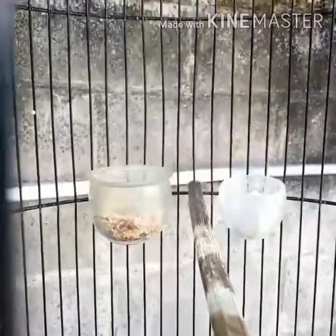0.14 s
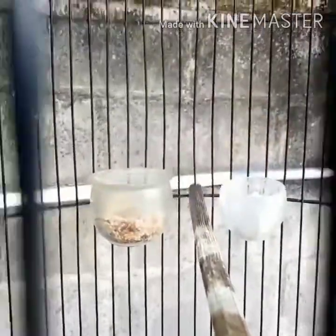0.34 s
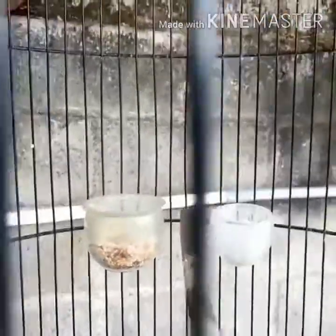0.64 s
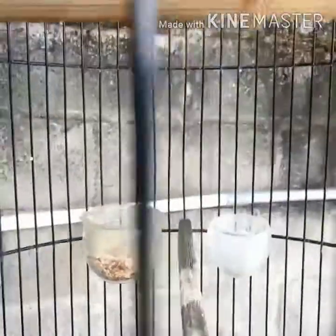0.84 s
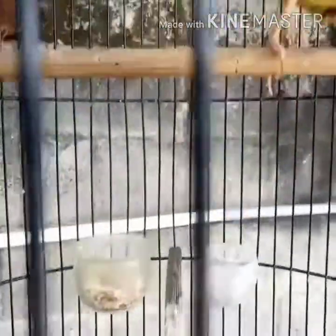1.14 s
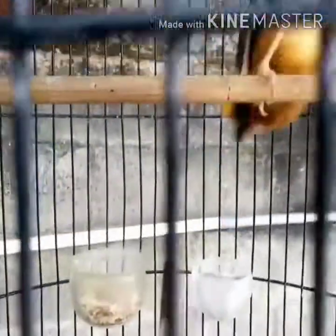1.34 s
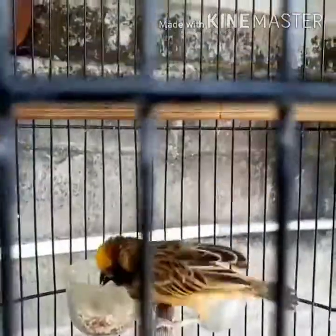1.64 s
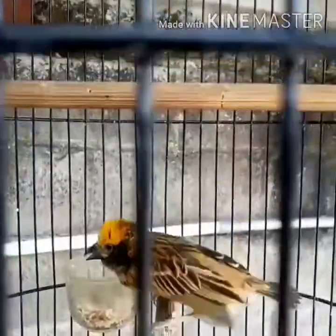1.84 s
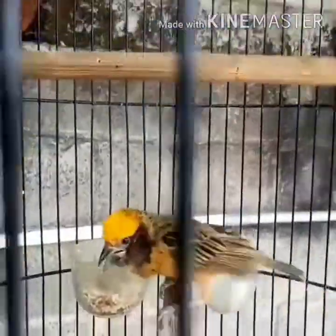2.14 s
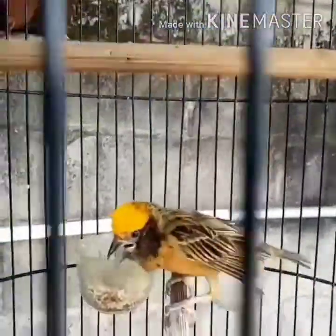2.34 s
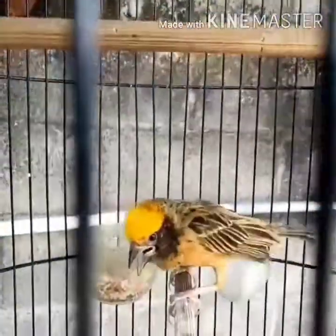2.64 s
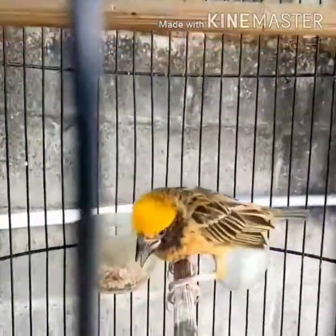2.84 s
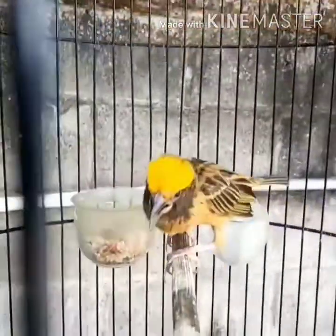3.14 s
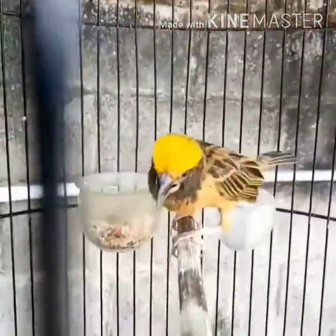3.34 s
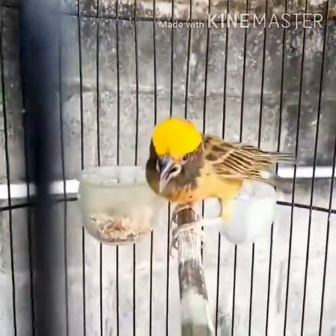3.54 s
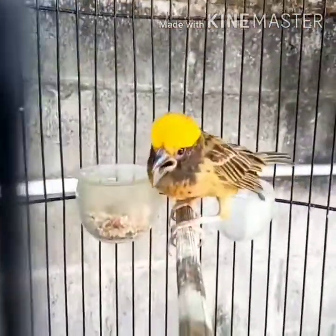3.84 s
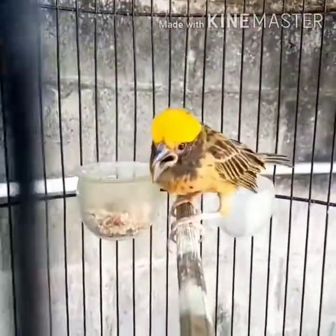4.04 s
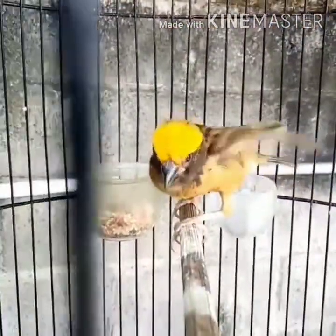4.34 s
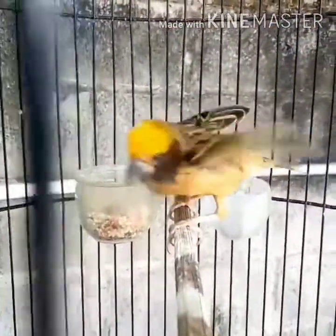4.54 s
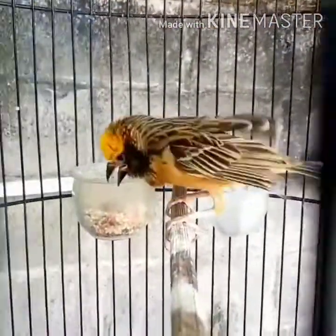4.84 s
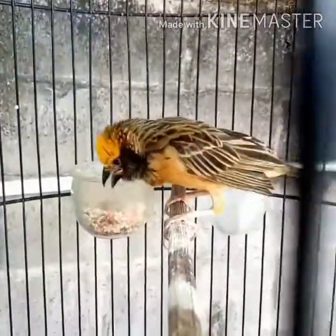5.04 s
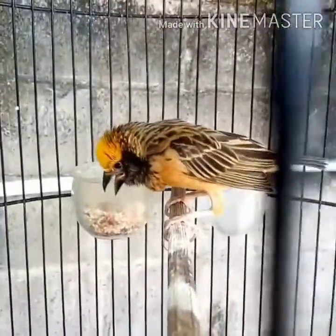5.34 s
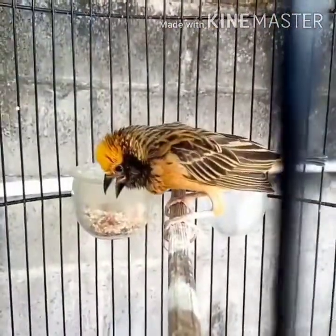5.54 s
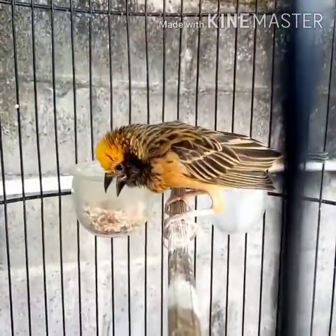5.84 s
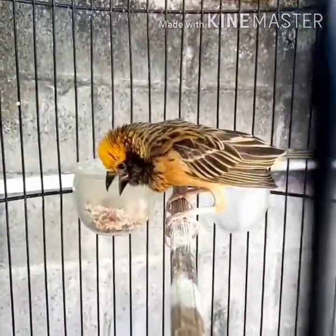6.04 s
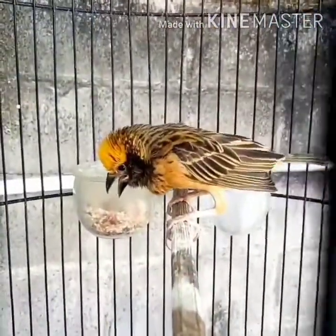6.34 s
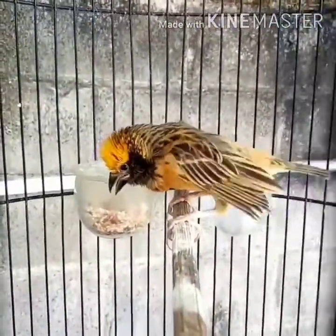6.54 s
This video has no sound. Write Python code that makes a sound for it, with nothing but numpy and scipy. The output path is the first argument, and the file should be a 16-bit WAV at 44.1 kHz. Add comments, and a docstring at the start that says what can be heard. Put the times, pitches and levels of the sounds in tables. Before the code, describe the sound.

Close birdsong in a walled yard: piercing whistles, five rapid downward chirps, long harsh buzzes, then a quivering trill that ends in a rattle.

```python
"""First come the fading tail of an earlier phrase and the whistles of a caged weaver bird close by in a walled yard.
Nasal notes and falling chirps lead into two long buzzes; then a whistle, two chirps, two whistles, a trill and a rattle.
Whistles, chirps and trill are sines with overtones, nasal notes and rattle are stacks of partials,
and buzzes are noise through a throat. Scuffs, blips, a faint band, hiss and wind are shaped noise or soft tones.
The walls ring briefly, and the recorder's gain control rides the level."""
import sys
import numpy as np
from scipy import signal
from scipy.fft import rfft, irfft
from scipy.io import wavfile
from scipy.ndimage import uniform_filter1d

SR = 44100
rng = np.random.default_rng(int(sys.argv[2]) if len(sys.argv) > 2 else 0)


def dump(signal):
    """Clip the signal to [-1, 1] and save it as 16-bit WAV at the path in sys.argv[1]."""
    limited = np.clip(np.atleast_2d(signal).T, -1, 1)
    pcm = np.round(limited * 32767).astype(np.int16)
    wavfile.write(sys.argv[1], SR, pcm)


N = 295457
T = np.arange(N) / SR   # time of every sample in s

# All source levels are those ahead of the recorder's gain control.
# A "colour" is a relative spectrum of noise: [f/Hz, level per Hz/dB]

# tail of an earlier phrase, a colour: [f/Hz, level per Hz/dB]
FADING_COLOUR = [(1200, -29), (2500, -2), (4300, -6.5), (6000, -13.5), (7500, -35)]
# slightly unsteady hiss of the yard, a colour: [f/Hz, level per Hz/dB]
YARD_COLOUR = [(120, -43), (200, -6.5), (338, -8), (532, -8), (781, -8), (1070, -8), (1340, -27.5),
               (1900, -9), (2190, 7), (3330, -9), (6130, -8.5), (7180, -40), (13000, -50)]
YARD_DB = -58.5
# rumble of moving air, a colour: [f/Hz, level per Hz/dB]
WIND_COLOUR = [(12, -64), (20, -60), (54, -11), (102, -7.5), (248, -25), (338, -26), (500, -42),
               (650, -68.5), (1100, -120)]
# puffs of air on the microphone: [middle t/s, level/dB, time from middle to 37 % height/s]
GUSTS = [(0.975, -68, 0.055), (1.486, -62, 0.069), (1.73, -51.5, 0.026), (2.454, -65, 0.067),
         (3.552, -52.5, 0.038), (3.774, -59, 0.033), (3.994, -59.5, 0.052), (4.398, -51, 0.017),
         (4.538, -53.5, 0.053), (4.74, -53, 0.027), (4.953, -59, 0.036), (5.235, -54, .11),
         (5.868, -64.5, 0.19), (6.308, -60, 0.11), (6.577, -49, 0.16)]
BREEZE_DB = -70.5
# faint noise band that swells and sinks: [f/Hz, width of each of two passes/Hz, level/dB]
BACKGROUND_BAND = [(1467, 350, -64)]

# whistles, one list a note: [t/s, f/Hz (the first partial sounds 1 % lower), level before flutter/dB]
WHISTLES = [
    [(0.018, 2848, -33), (0.03, 2790, -9.5), (0.054, 2597, -14.5), (0.082, 2620, -10), (0.094, 2698, -17.5),
     (0.102, 2606, -17.5), (0.138, 2820, -18), (0.158, 2570, -40)],
    [(0.322, 3186, -32.5), (0.328, 2970, -18), (0.346, 2740, -11.5), (0.368, 2820, -8), (0.41, 2851, -10),
     (0.438, 2688, -15), (0.464, 2693, -15.5), (0.475, 2750, -73)],
    [(4.405, 3050, -25), (4.413, 3106, -9.5), (4.447, 2683, -16), (4.453, 2477, -16), (4.457, 2600, -44),
     (4.461, 2650, -17), (4.48, 2585, -27.5)],
    [(4.935, 6300, -22), (4.943, 6240, -23), (4.955, 5570, -24.5), (4.977, 4810, -10.5),
     (4.991, 4510, -16.5), (5.057, 4154, -15.5), (5.081, 4380, -16.5), (5.085, 4400, -23)],
    [(5.18, 3400, -32), (5.188, 3420, -23.5), (5.222, 3300, -15.5), (5.24, 3000, -37), (5.272, 2500, -38)],
]
# how deeply each whistle flutters: [depth/dB]
WHISTLE_FLUTTER = [1.8, .5, 2.5, 3.5, 7]
# overtones of each whistle against its first partial: [2nd level/dB, 3rd level/dB]
WHISTLE_OVERTONES = [(-35.5, -46), (-36, -50.5), (-28.5, -41), (-29.5, -24), (-22.5, -30)]
# breath around whistles and nasal notes, a colour: [f/Hz, level per Hz/dB]
WHISTLE_BREATH = [(1500, -53), (3000, 23), (6000, 17.5), (7800, -2), (10000, 10), (12000, -31),
                  (13600, -60)]
# the voice breaks into a harsh band at the head of two chirps and of the trill:
# [t/s, length/s, low f/Hz, high f/Hz, level/dB]
VOICE_BREAKS = [(4.598, 0.023, 4820, 6180, -18.5), (4.802, 0.022, 4050, 5650, -24),
                (5.219, 0.074, 2890, 4630, -25)]
OVERTONE_CUT_HZ, OVERTONE_SLOPE_DB = 11500, 40   # overtones fade above this, in dB per octave

# falling chirps: [start t/s, end t/s, top f/Hz, bottom f/Hz (first partials sound 1 % lower),
# fall/octaves per s above the resting pitch, level before flutter/dB, held top against that level/dB]
CHIRPS = [(1.743, 1.831, 5560, 2406, 23.7, -19, -2), (1.889, 1.986, 6280, 2418, 22.9, -21.5, -12),
          (2.026, 2.113, 6200, 2337, 27.5, -19.5, -3.5), (2.171, 2.263, 6390, 2366, 25.4, -18.5, -9.5),
          (2.302, 2.391, 6260, 2448, 25, -20, -1), (4.589, 4.687, 5890, 2440, 21.8, -19, -24),
          (4.784, 4.879, 5950, 2424, 23.8, -19.5, 2.5)]
# chirp overtones against the first partial: [2nd level/dB, 3rd level/dB]
CHIRP_OVERTONES = (-27, -36)
CHIRP_FLUTTER_DB = 6
CHIRP_REST_HZ = 1200   # the fall slows toward this pitch; its octaves are counted from there
CHIRP_BEND = .018   # the pitch wavers by this share (rms)
CHIRP_SCOOP, CHIRP_SCOOP_S = 0.0513, 0.00396   # the top starts low by this share and climbs within this time
CHIRP_DIP_DB, CHIRP_DIP_S = 9, .003   # the voice catches where the held top breaks into the fall
CHIRP_FADE_DB, CHIRP_FADE_S = 12.5, 0.046   # the end of the fall dies away

# feet and feathers against perch and wire: [t/s, level/dB, length/s, share that rings the perch/dB]
SCUFFS = [(0.347, -40, 0.0088, -22.5), (1.209, -43.5, 0.051, -31), (1.69, -37, 0.043, 7.5),
          (2.288, -29, 0.026, -43)]
# tones of the perch, before a treble lift: [f/Hz, level/dB, time to fall by 60 dB/s]
PERCH_TONES = [(600, 12, .025), (930, 1, .02), (1420, 1, .02), (2300, -3, .02)]
# faint low blips and far hoots: [t/s, length/s, f/Hz, level/dB]
BLIPS = [(0.465, 0.095, 804, -63), (0.812, 0.062, 335, -63.5), (1.478, 0.078, 740, -65.5),
         (1.964, 0.069, 698, -58.5), (2.108, 0.043, 1440, -45.5), (2.261, 0.066, 600, -56.5),
         (2.414, 0.078, 669, -57), (2.642, 0.094, 337, -59.5), (5.58, 0.21, 998, -60),
         (5.885, 0.19, 1090, -55)]

# nasal notes, one list a note: [t/s, f of the fifth partial/Hz, its level/dB]
NASAL_NOTES = [
    [(1.296, 3004, -24), (1.304, 3030, -20.5), (1.334, 2893, -10), (1.38, 2937, -17), (1.41, 2900, -29)],
    [(1.542, 3069, -28), (1.548, 3130, -27.5), (1.574, 2947, -10), (1.62, 3044, -16.5), (1.642, 2982, -11),
     (1.656, 3118, -19.5), (1.665, 3000, -24)],
]
# their other partials against the fifth: [multiple, level in the first note/dB, level in the second/dB]
NASAL_PARTIALS = [(4, -22, -8), (6, -24, -20), (7, -47, -33.5), (8, -22, -27), (9, -34, -20.5),
                  (10, -25, -21.5), (11, -38, -32.5), (13, -47, -43), (15, -42, -46), (18, -52, -46),
                  (19, -49, -50)]

# buzzes, before waver: [start t/s, end t/s, first level/dB, last level/dB]
BUZZES = [(2.477, 3.477, -21.5, -20), (3.59, 4.322, -18.5, -18)]
# throat resonances with the beak narrow: [f/Hz, width of each of two passes/Hz, relative level/dB]
THROAT_NARROW = [(2265, 390, -3), (3032, 61, -0.5), (3660, 415, -1.5), (4555, 380, 1), (5195, 170, -0.5),
                 (5863, 380, 3.5), (7070, 1340, -10.5), (10150, 940, -11.5), (11900, 640, -18.5)]
# throat resonances with the beak wide: [f/Hz, width of each of two passes/Hz, relative level/dB]
THROAT_WIDE = [(2315, 163, 3), (3240, 900, 0.5), (3640, 590, -4), (4662, 710, 6), (5270, 900, 3.5),
               (6090, 287, 16), (6640, 850, 4), (9400, 500, -9), (11230, 1050, -5.5)]
# beak opening: [t/s, share from 0 to 1]
BEAK_OPENING = [(2.47, .03), (2.85, .12), (3.03, .6), (3.3, .8), (3.5, .9), (4.34, .97)]
# breath in the buzzes, a colour: [f/Hz, level per Hz/dB]
BUZZ_BREATH = [(1000, -97), (1500, -20.5), (2200, -11.5), (4000, -7.5), (6000, 1.5), (7500, -25),
               (8500, -11.5), (11800, -33), (12400, -4), (13600, -45)]
BUZZ_ATTACK_S, BUZZ_RELEASE_S, BUZZ_WAVER_DB = .007, 0.015, 1.0

# trill: [t/s, centre f/Hz, level before dips and beats/dB]
TRILL = [(5.235, 3800, -31), (5.275, 4040, -21), (5.332, 4270, -17.5), (5.43, 4434, -16),
         (5.736, 4155, -16.5), (5.83, 4200, -19.5), (5.87, 4005, -19.5), (6.118, 3810, -20),
         (6.18, 3750, -23.5)]
# trill pulses run together: [t/s, share]
TRILL_FUSING = [(5.225, .05), (5.8, .15), (5.95, .5), (6.15, .6), (6.19, .3)]
# breath in trill and rattle, a colour: [f/Hz, level per Hz/dB]
TRILL_BREATH = [(1500, -50), (2000, -30), (2500, -10), (3500, -6.5), (5500, 4.5), (7000, -7.5), (9300, -16),
                (10200, 2.5), (11300, -23.5), (12600, -7), (13600, -4.5)]
TRILL_RATE, TRILL_FIRST_S = 52.33, 5.2585   # pulses per s, start of a pulse in s
TRILL_RISE = .14   # slope of the pitch in shares per pulse length; it climbs for 65 % of a pulse
TRILL_SECOND_DB, SECOND_GROWS_DB_PER_S, TRILL_THIRD_DB = -39, 33.5, -22   # against the first partial
TRILL_BREATH_DB = -32.5

# rattle partials, relative levels: [multiple, level/dB]
RATTLE_PARTIALS = [(3, -4), (4, -1.5), (1, -21.5), (2, -9), (4.5, -8.5), (5, -16.5), (6, -25), (8, -35),
                   (9, -27)]
RATTLE_HZ = 1198
RATTLE_START_S, RATTLE_GAP_S, RATTLE_PULSES = 6.1818, .0192, 17
RATTLE_SLOWS_FROM, RATTLE_SLOWER_S = 11, .0015   # gaps after this pulse are this much longer
RATTLE_DB, RATTLE_ENDS_DB, RATTLE_UNEVEN_DB = -19.5, 1.5, -1   # weaker at both ends, uneven by chance
# low partials grow late, are stronger on every other pulse, and die fast like a knock
RATTLE_LOW_DB, LOW_GROWS_DB, LOW_ALTERNATES_DB, LOW_DIES_DB_PER_S = -11, 8, 6.5, 2500

# what the walls return best: [f/Hz, level/dB]
WALL_COLOUR = [(1000, 0.5), (2800, -9.5), (3800, -1.5), (5000, -5.5), (6200, -4), (13000, -0.5)]
CUTOFF_HZ = 13850   # top of the recorder's range


def amp(db):
    """Turn decibels into gain."""
    return 10 ** (np.asarray(db) / 20)


def rms_one(x):
    """Scale to unit power."""
    return x / np.sqrt(np.mean(x ** 2) + 1e-20)


def in_time(rows, edge_s=0.0017):
    """Give a soft-edged gate over the rows' span, then each column at every sample."""
    s, *columns = np.transpose(rows)
    gate = np.clip(np.minimum(T - s[0], s[-1] - T) / edge_s, 0, 1)
    return [gate] + [np.interp(T, s, c) for c in columns]


def pass_filter(kind, order, hz, x):
    """Pass x through a smooth low, high or band filter."""
    return signal.sosfilt(signal.butter(order, hz, kind, fs=SR, output="sos"), x)


def drift(rate_hz):
    """Wander at random, mostly slower than rate_hz, with rms 1."""
    return rms_one(pass_filter("low", 2, rate_hz, rng.standard_normal(N)))


def colour(x, points):
    """Shape a noisy signal to a spectrum; rms 1."""
    hz, db = np.transpose(points)
    bins = np.arange(N // 2 + 1) * SR / N + 1   # the 1 keeps the logarithm finite
    gain = amp(np.interp(np.log(bins), np.log(hz), db))
    return rms_one(irfft(rfft(x) * gain, N))


def resonate(x, hz, width_hz):
    """Favour one pitch, like an air cavity, with gain 1 at the peak."""
    r = np.exp(-np.pi * width_hz / SR)
    top = np.array([1, 0, -1]) * (1 - r * r) / 2
    return signal.lfilter(top, [1, -2 * r * np.cos(2 * np.pi * hz / SR), r * r], x)


def resonate_twice(x, hz, width_hz):
    """Two passes give a resonance with steeper sides."""
    return resonate(resonate(x, hz, width_hz), hz, width_hz)


def ring(push, hz, t60):
    """Let pushes start a dying sine; a unit click starts one of height 1."""
    r, w = amp(-60 / (t60 * SR)), 2 * np.pi * hz / SR
    return signal.lfilter([0, np.sin(w)], [1, -2 * r * np.cos(w), r * r], push + 1e-18)


def partials(pitch_hz, levels, blur=0):
    """Add sines at (multiple, rms dB) of one pitch; phase noise blurs all but the first listed."""
    phase = 2 * np.pi * np.cumsum(pitch_hz) / SR
    total = 0
    for i, (k, db) in enumerate(levels):
        sine = np.sin(k * phase + (i > 0) * k * blur)
        total = total + np.sqrt(2) * amp(db) * sine * (k * pitch_hz < SR / 2)
    return total


def fading_song():
    """The tail of an earlier phrase is coloured noise that falls by 31 dB a second."""
    return amp(-42 - 31 * T) * colour(rng.standard_normal(N), FADING_COLOUR)


def yard_hiss():
    """The yard's hiss is coloured noise with a slightly unsteady level."""
    return amp(YARD_DB + drift(10)) * colour(rng.standard_normal(N), YARD_COLOUR)


def wind():
    """A faint breeze and separate puffs press on the microphone as lumpy low noise."""
    puffs = sum(amp(db) * np.exp(-((T - s) / half) ** 2) for s, db, half in GUSTS)
    lumps = amp(1.9 * drift(15.0))
    return (amp(BREEZE_DB) + puffs) * lumps * colour(rng.standard_normal(N), WIND_COLOUR)


def background_band():
    """Noise through a steep resonance makes a faint band that swells and sinks."""
    out = 0
    for hz, width_hz, db in BACKGROUND_BAND:
        band = rms_one(resonate_twice(rng.standard_normal(N), hz, width_hz))
        out = out + amp(db + 5.7 * drift(6.4)) * band
    return out


def whistles_and_chirps():
    """Near sines have a fluttering level, coming and going overtones and a little breath; some break."""
    out, shiver, blur = 0, drift(70) ** 2, .09 * drift(300)
    breath = amp(-36) * colour(rng.standard_normal(N), WHISTLE_BREATH)
    fickle_db = 5.0 * drift(22)   # overtones come and go
    notes = list(zip(map(in_time, WHISTLES), WHISTLE_FLUTTER, WHISTLE_OVERTONES))
    notes += [(chirp(*row), CHIRP_FLUTTER_DB, CHIRP_OVERTONES) for row in CHIRPS]
    for (gate, hz, db), depth_db, (second_db, third_db) in notes:
        overtones = []
        for k, rel_db in zip((2, 3, 4), (second_db, third_db, third_db - 7.0)):
            octaves_over = np.clip(np.log2(k * hz / OVERTONE_CUT_HZ), 0, None)
            overtones.append((k, db + rel_db + fickle_db - OVERTONE_SLOPE_DB * octaves_over))
        tone = partials(hz, [(0.99, db)] + overtones, (1.0 + depth_db) * blur)
        flutter = amp(depth_db * (1.37 - shiver))
        out = out + gate * (flutter * tone + amp(db + 1.97 * depth_db) * breath)
    for s, length, low_hz, high_hz, db in VOICE_BREAKS:
        harsh = rms_one(pass_filter("band", 4, [low_hz, high_hz], rng.standard_normal(N)))
        out = out + in_time([(s, 0), (s + length, 0)])[0] * amp(db) * harsh
    return out


def cage():
    """Scuffs are bursts of bright noise that also shake the perch."""
    noise, out = rng.standard_normal(N), 0
    shaken = sum(amp(db) * ring(noise, hz, t60) for hz, db, t60 in PERCH_TONES)
    perch = rms_one(np.diff(shaken, 2, prepend=[0, 0]))   # taking differences lifts the treble
    bright = colour(noise, [(400, -51), (1000, -8.5), (3000, 5.0), (9000, -5.0), (13600, -7)])
    for s, db, length, ring_db in SCUFFS:
        since = np.clip(T - s, 0, None)
        shape = np.minimum(since / 0.0098, 1) * np.exp(-(since / length) ** 3)
        out = out + amp(db) * shape * (amp(ring_db) * perch + amp(-7) * bright)
    return out


def blips():
    """Blips and hoots are soft sines with slightly unsteady pitch and level."""
    waver, flicker_db, out = 1 + .03 * drift(40), 3 * drift(25), 0
    for s, length, hz, db in BLIPS:
        gate = in_time([(s, 0), (s + length, 0)], edge_s=.014)[0]
        out = out + gate * partials(hz * waver, [(1, db + flicker_db)])
    return out


def nasal_notes():
    """The throat passes mainly the fifth partial of a slow membrane pulse; the others come and go."""
    out, breath = 0, amp(-26.5) * colour(rng.standard_normal(N), WHISTLE_BREATH)
    blur = .035 * drift(150)
    for note, rows in enumerate(NASAL_NOTES):
        gate, fifth_hz, db = in_time(rows)
        others = [(k, db + rel_db[note] + 3.5 * drift(25)) for k, *rel_db in NASAL_PARTIALS]
        out = out + gate * (partials(fifth_hz / 5, [(5, db)] + others, blur) + amp(db) * breath)
    return out


def chirp(start, end, top_hz, bottom_hz, fall, db, head_db):
    """A held top gives way to a fall that slows as it goes; returns gate, pitch and level."""
    falling = CHIRP_REST_HZ + (bottom_hz - CHIRP_REST_HZ) * 2 ** np.clip(fall * (end - T), 0, 4)
    fall_octaves = np.log2((top_hz - CHIRP_REST_HZ) / (bottom_hz - CHIRP_REST_HZ))
    breaks = end - fall_octaves / fall   # when the fall begins
    held = top_hz * (1 - CHIRP_SCOOP * np.exp(-np.abs(T - start) / CHIRP_SCOOP_S))
    smooth = uniform_filter1d(np.minimum(falling, held), size=150)
    hz = smooth * (1 + CHIRP_BEND * drift(35))
    head = head_db * np.clip((breaks + 0.011 - T) / 0.015, 0, 1)
    dip = CHIRP_DIP_DB * np.exp(-((T - breaks) / CHIRP_DIP_S) ** 2)
    fade = CHIRP_FADE_DB * np.clip(1 - (end - T) / CHIRP_FADE_S, 0, 1)
    return in_time([(start, 0), (end, 0)])[0], hz, db + head - dip - fade


def throat(air, modes, wander_db):
    """Side-by-side steep resonances colour the air, each with a wandering strength; rms 1."""
    out = 0
    for k, (hz, width_hz, db) in enumerate(modes):
        strength = (-1) ** k * amp(db + wander_db * drift(9.7))   # neighbours have opposite signs
        out = out + strength * resonate_twice(air, hz, width_hz)
    return rms_one(out)


def buzzes():
    """Uneven puffs of turbulent air, some 220 a second, pass through a throat that opens."""
    cycle = np.cumsum(222 * (1 + 0.0984 * drift(28.7))) / SR
    puffs = 1 + 0.12 * np.cos(2 * np.pi * cycle)
    air = rng.standard_normal(N) * puffs * amp(0.13 * drift(6.8))
    narrow = throat(air, THROAT_NARROW, wander_db=1.5)
    wide = throat(air, THROAT_WIDE, wander_db=1.5)
    breath = amp(-10) * colour(air[::-1], BUZZ_BREATH)   # air turned back to front, as separate noise
    opening = np.clip(in_time(BEAK_OPENING)[1], 0, 1)
    voice = np.sqrt(1 - opening) * narrow + np.sqrt(opening) * wide + breath
    waver_db, out = BUZZ_WAVER_DB * drift(3.7), 0
    for start, end, first_db, last_db in BUZZES:
        gate = np.clip(np.minimum((T - start) / BUZZ_ATTACK_S, (end - T) / BUZZ_RELEASE_S), 0, 1)
        level_db = np.interp(T, [start, end], [first_db, last_db]) + waver_db
        out = out + gate * amp(level_db) * voice
    return out


def trill():
    """Each pulse is a short rising whistle with a weaker after-beat and a puff of breath."""
    gate, hz, db = in_time(TRILL)
    place = (TRILL_RATE * (T - TRILL_FIRST_S) + .04 * drift(30)) % 1   # 0 to 1 through each pulse
    main = np.exp(-((place - .5) / 0.31) ** 2)
    after = .5 * np.exp(-((place - .9) / 0.041) ** 2)
    fused = in_time(TRILL_FUSING)[1]
    beat = (main + after) * amp(2.0 * drift(27)) + fused
    rise = TRILL_RISE * (1 - fused)
    pitch = hz * (1 + rise * (np.minimum(place, .65) - .5) + .009 * drift(150))
    dips = amp(4.5 * (.8 - drift(161) ** 2))
    second_db = db + TRILL_SECOND_DB + SECOND_GROWS_DB_PER_S * (T - TRILL[0][0]) + 2.5 * drift(34)
    overtones = partials(pitch, [(2, second_db), (3, db + TRILL_THIRD_DB)])
    # overtones keep to the height of a pulse
    tone = beat * partials(pitch, [(1, db)]) + main ** 2 * overtones
    breath = amp(TRILL_BREATH_DB) * colour(rng.standard_normal(N), TRILL_BREATH)
    return gate * (dips * tone + (.55 + .8 * main ** 2) * breath)


def rattle():
    """Short nasal pulses, each led by a click, sound over breath."""
    n = np.arange(RATTLE_PULSES)
    luck = rng.standard_normal((len(n), len(RATTLE_PARTIALS) + 3))
    uneven, late, detune = luck[:, -3], luck[:, -2], luck[:, -1]
    slowing = RATTLE_SLOWER_S * np.maximum(n - RATTLE_SLOWS_FROM, 0)
    s = RATTLE_START_S + RATTLE_GAP_S * n + slowing + .0007 * late
    along = n / n[-1]
    peak_db = RATTLE_DB - RATTLE_ENDS_DB * (2 * along - 1) ** 4 + RATTLE_UNEVEN_DB * uneven
    low_db = RATTLE_LOW_DB + LOW_GROWS_DB * along ** 2 + LOW_ALTERNATES_DB * (-1) ** n
    which = np.clip(np.searchsorted(s, T) - 1, 0, None)   # the pulse sounding at each sample
    since = np.clip(T - s[which], 0, None)
    shape = (since / 0.003) * np.exp(1 - since / 0.0031)
    pitch = RATTLE_HZ * (1 + 0.015 * detune[which] + 0.018 * drift(200))
    levels = []
    for i, (k, db) in enumerate(RATTLE_PARTIALS):
        low = (low_db[which] - LOW_DIES_DB_PER_S * since) * (k < 3)
        levels.append((k, peak_db[which] + db + 2.0 * luck[which, i] + low))
    air = colour(rng.standard_normal(N), TRILL_BREATH)
    snap = (since > 0) * np.exp(-since / 0.0022)
    click = amp(peak_db[which] - 16.5) * snap * rng.standard_normal(N)
    gate = in_time([(s[0] - .006, 0), (s[-1] + 0.0026, 0)], edge_s=0.0066)[0]
    breath = (gate * amp(-32.5) + shape * amp(-29.5)) * air
    return shape * partials(pitch, levels) + click + breath


def walls(x, t60, cut_hz=4500, points=()):
    """Many close echoes form a dense noise tail with a dull and a brighter part that both die away."""
    t = T[:SR]
    dull, bright = rng.standard_normal((2, SR)) * np.clip((t - .004) / 0.0011, 0, 1)
    dull = pass_filter("low", 3, cut_hz, dull)
    bright = pass_filter("low", 1, 5000, bright)
    tail = dull * amp(-60 * t / t60) + amp(0.5) * bright * amp(-60 * t / (0.91 * t60))
    if points:
        hz, db = np.transpose(points)
        bins = np.arange(SR // 2 + 1) + 1
        tail = irfft(rfft(tail) * amp(np.interp(np.log(bins), np.log(hz), db)), SR)
    return signal.fftconvolve(x, tail / np.sqrt(np.sum(tail ** 2)))[:N]


def scene():
    """Mix the bird and its echoes over yard hiss, a faint band and wind, with some treble spread sideways."""
    buzz = buzzes()
    bird = whistles_and_chirps() + nasal_notes() + buzz + trill() + rattle()
    near = pass_filter("high", 4, 1200, bird) + cage()
    echoes = amp(-11) * walls(near, t60=0.41, points=WALL_COLOUR)
    background = fading_song() + yard_hiss() + wind() + background_band() + blips()
    middle = near + echoes + background
    # above about 4 kHz the two channels differ by fits and starts, mostly during the buzzes
    fits = amp(-15 + 10 * np.tanh(2 * drift(8)))
    wide = fits * walls(buzz + amp(-16) * middle, t60=.05, cut_hz=13000)
    wide = pass_filter("high", 10, 4300, wide)
    return middle + wide * [[1], [-1]]


def record(dry):
    """Gain control lifts quiet moments, holds back loud ones and recovers gradually; the top is cut."""
    level_db = 10 * np.log10(uniform_filter1d(np.mean(dry, axis=0) ** 2, size=300) + 1e-9)
    held_db = np.maximum.accumulate(level_db + 90 * T) - 90 * T   # peaks sink by 90 dB a second
    lift_db = uniform_filter1d(.3 * (-16 - np.clip(held_db, -45, 0)), size=200)
    top_cut = signal.cheby2(12, 70, CUTOFF_HZ, fs=SR, output="sos")
    return signal.sosfilt(top_cut, dry * amp(lift_db))


dry = scene()
out = record(dry)
dump(out)
```